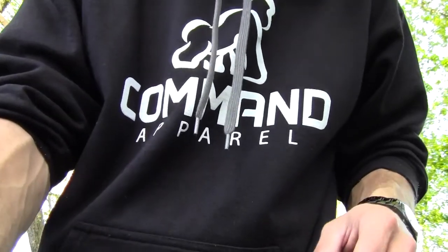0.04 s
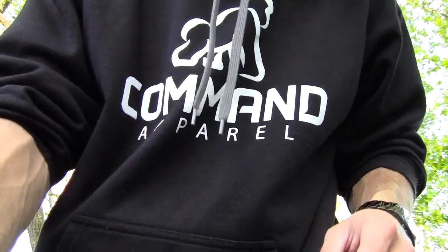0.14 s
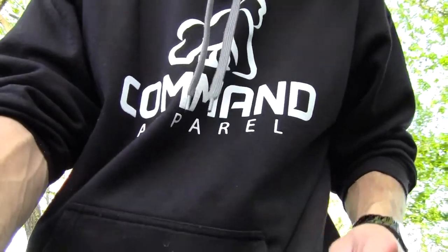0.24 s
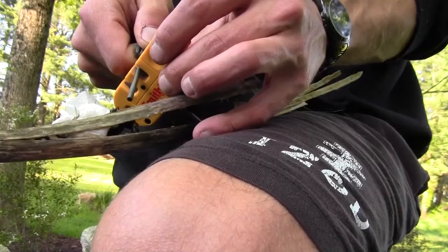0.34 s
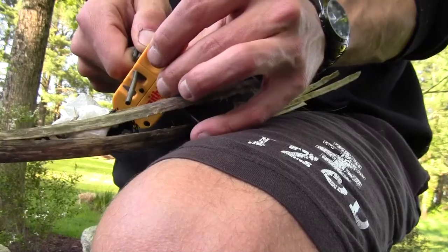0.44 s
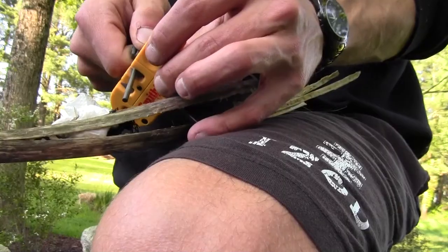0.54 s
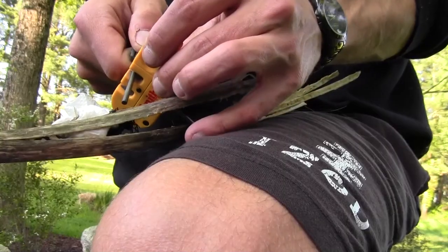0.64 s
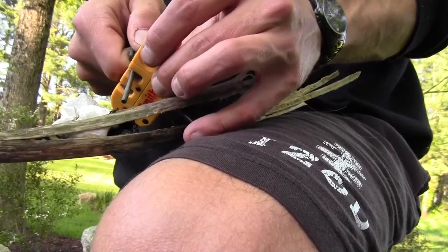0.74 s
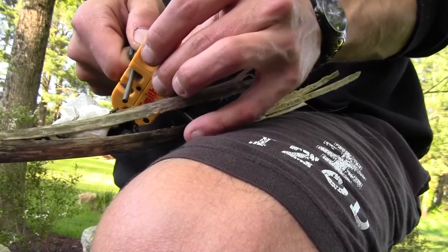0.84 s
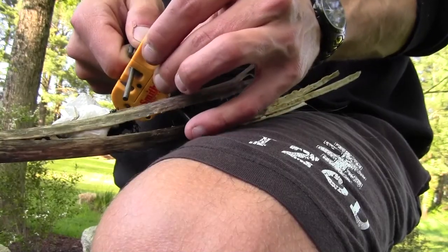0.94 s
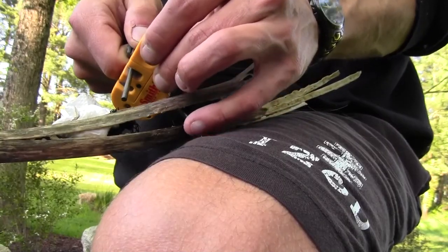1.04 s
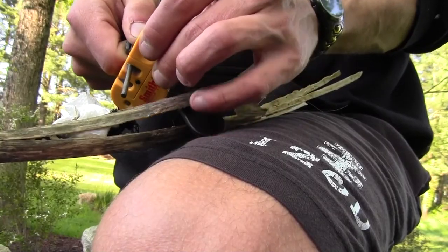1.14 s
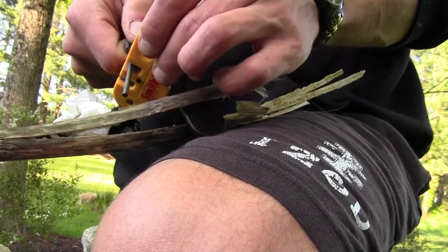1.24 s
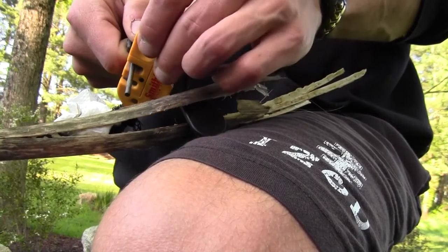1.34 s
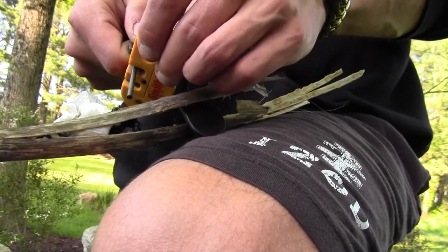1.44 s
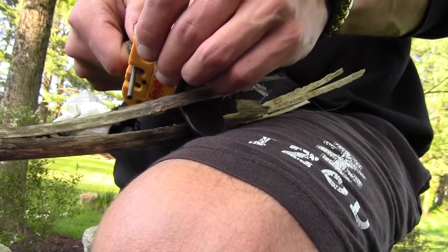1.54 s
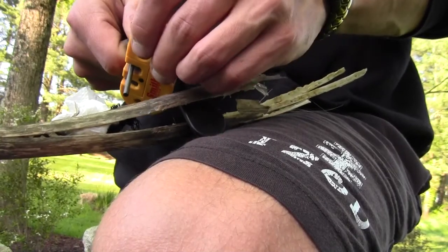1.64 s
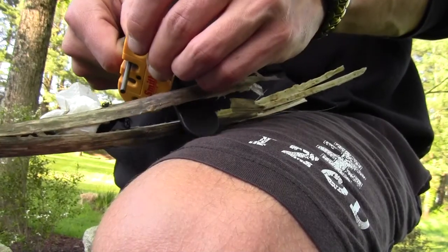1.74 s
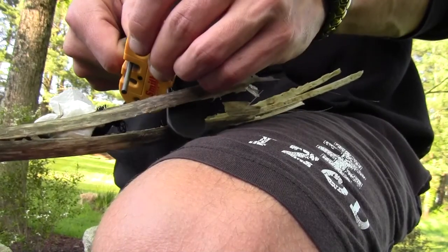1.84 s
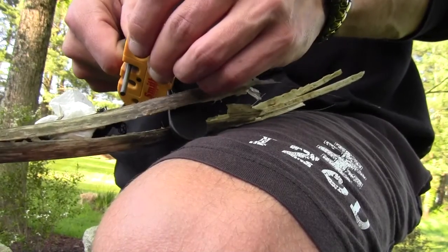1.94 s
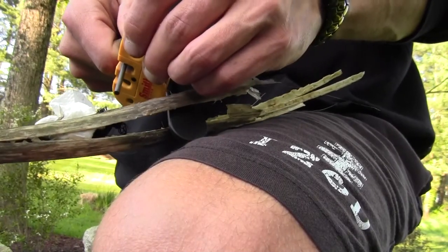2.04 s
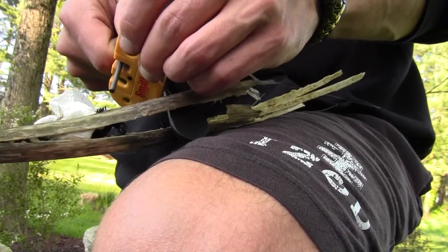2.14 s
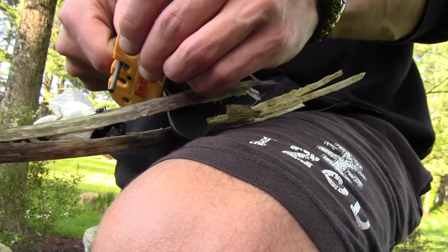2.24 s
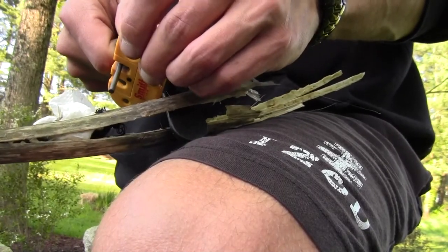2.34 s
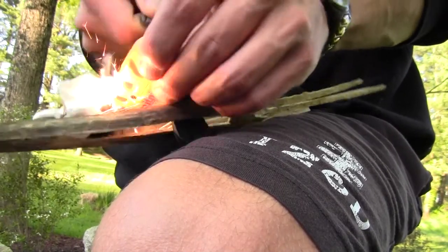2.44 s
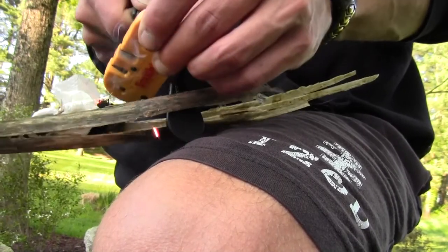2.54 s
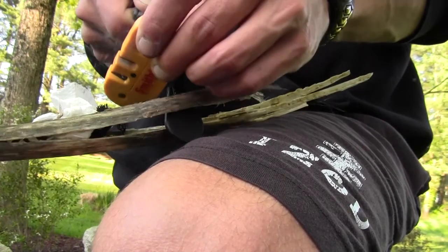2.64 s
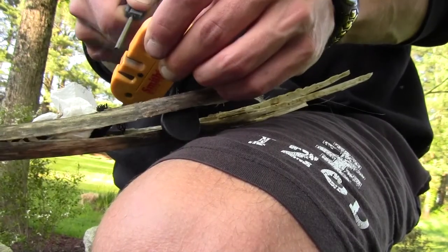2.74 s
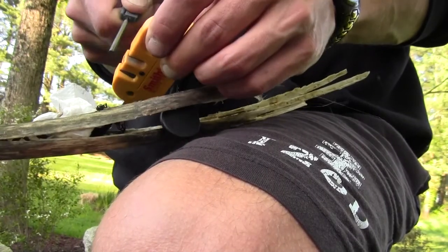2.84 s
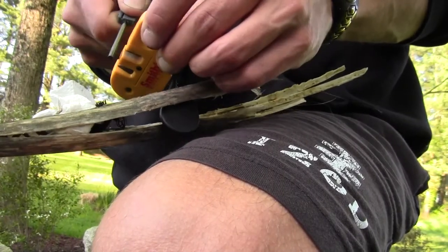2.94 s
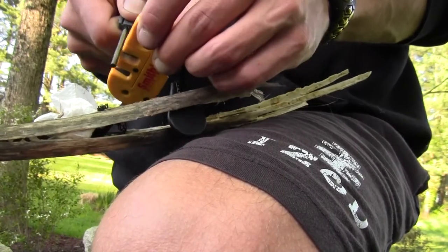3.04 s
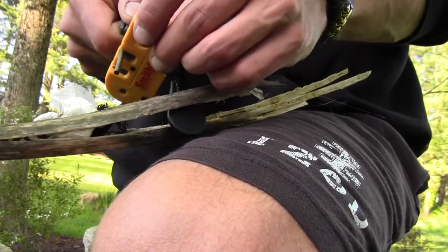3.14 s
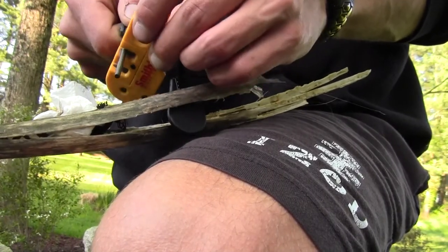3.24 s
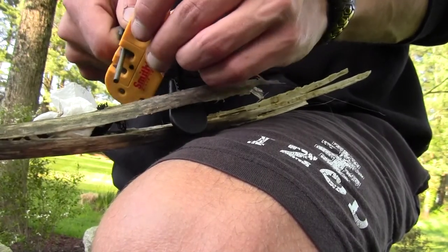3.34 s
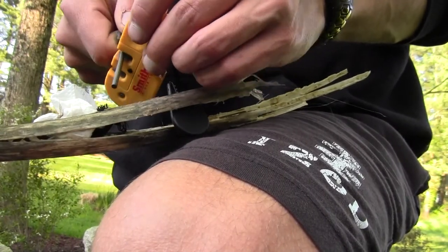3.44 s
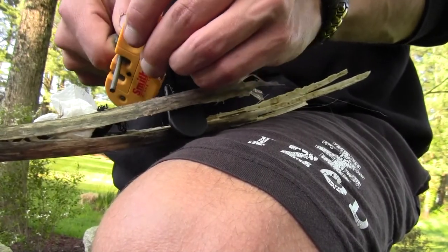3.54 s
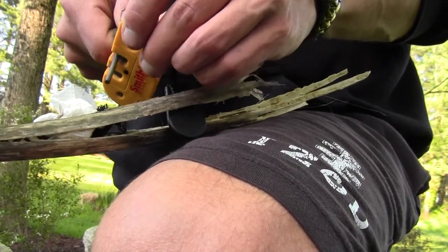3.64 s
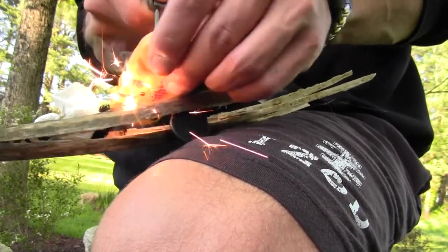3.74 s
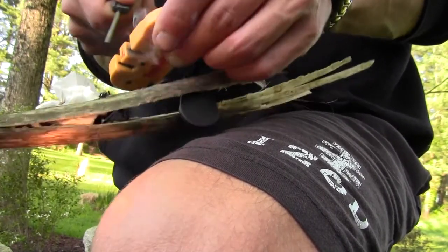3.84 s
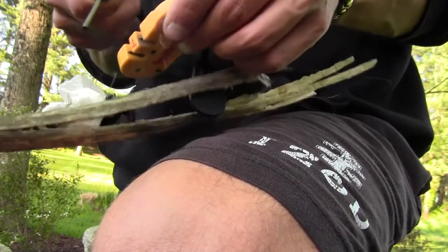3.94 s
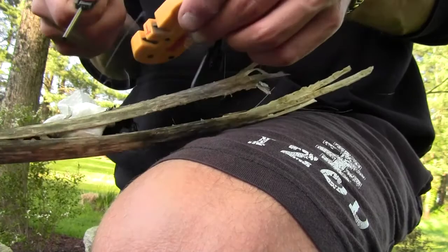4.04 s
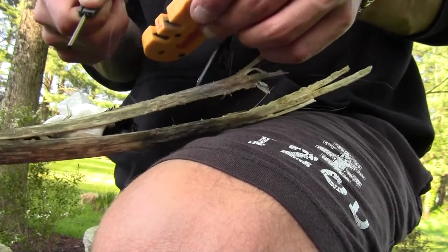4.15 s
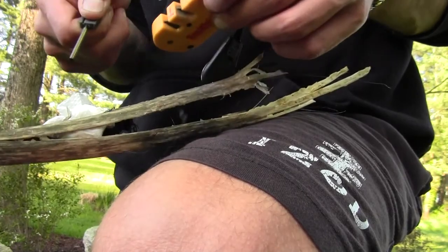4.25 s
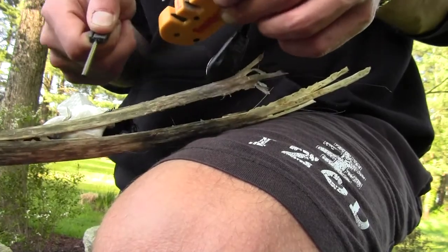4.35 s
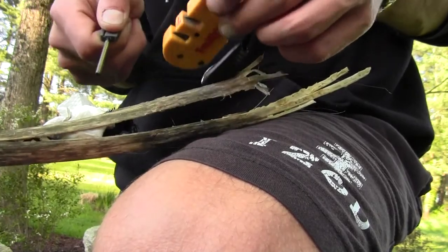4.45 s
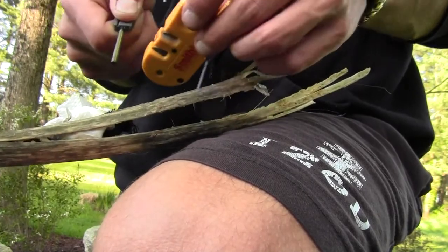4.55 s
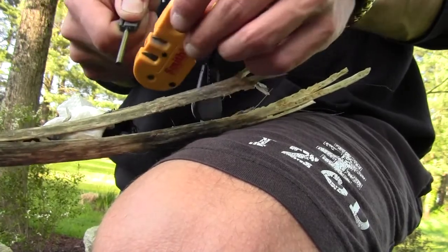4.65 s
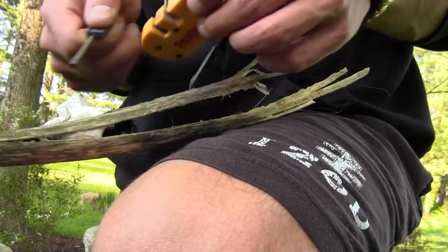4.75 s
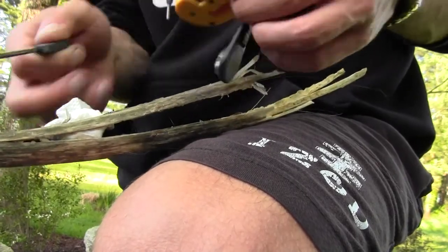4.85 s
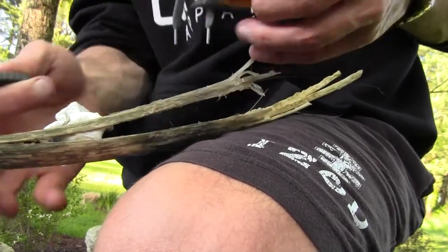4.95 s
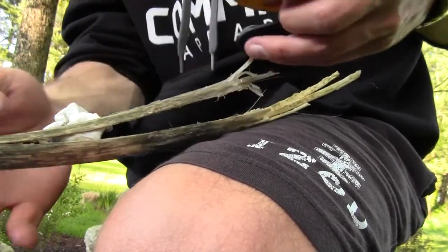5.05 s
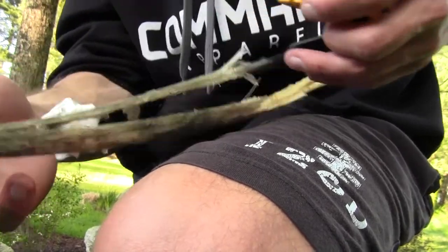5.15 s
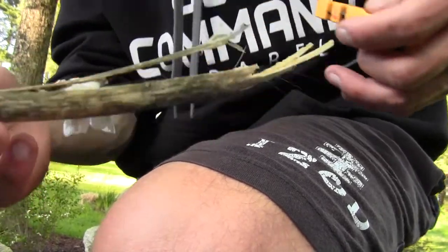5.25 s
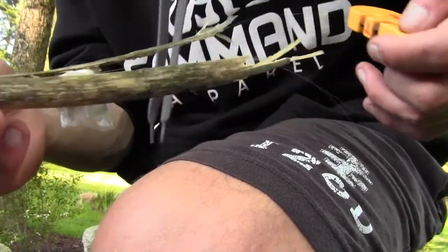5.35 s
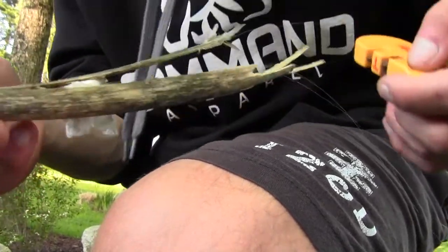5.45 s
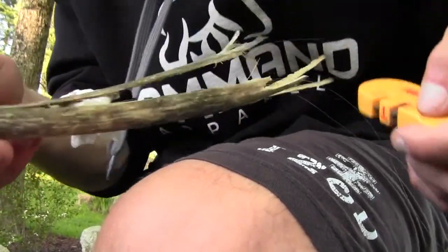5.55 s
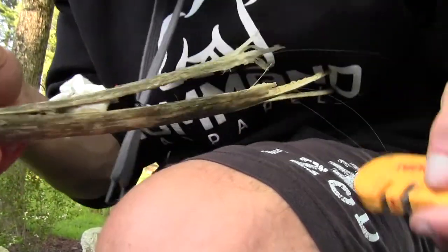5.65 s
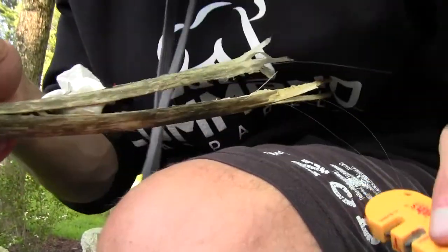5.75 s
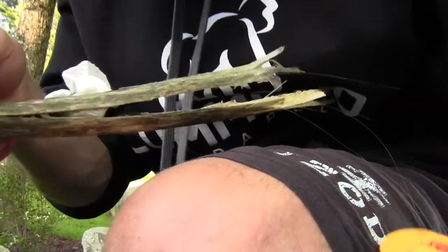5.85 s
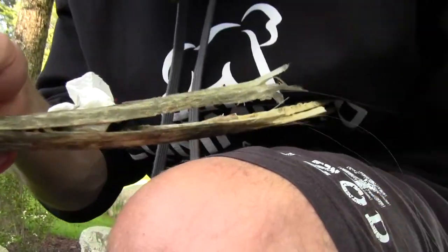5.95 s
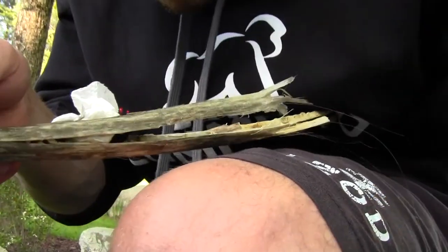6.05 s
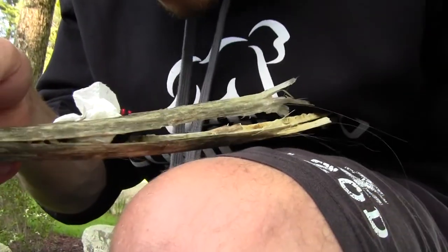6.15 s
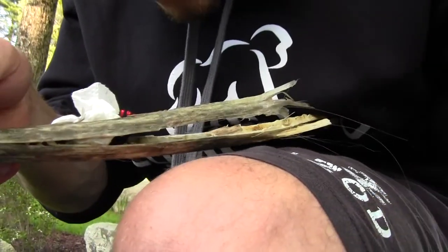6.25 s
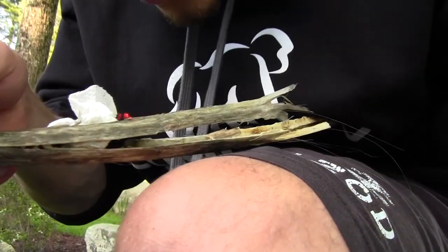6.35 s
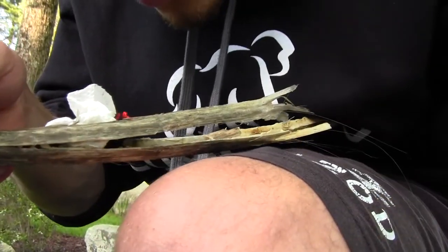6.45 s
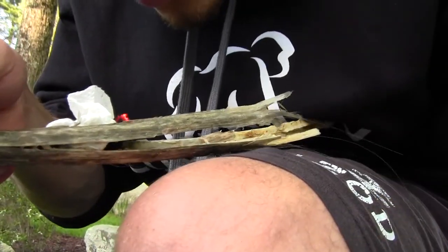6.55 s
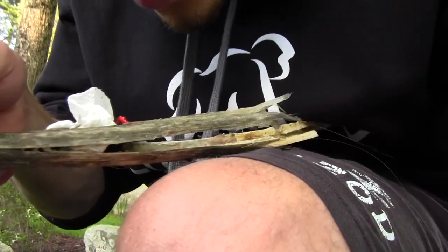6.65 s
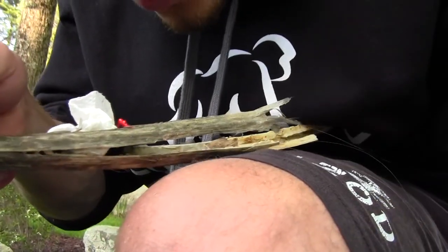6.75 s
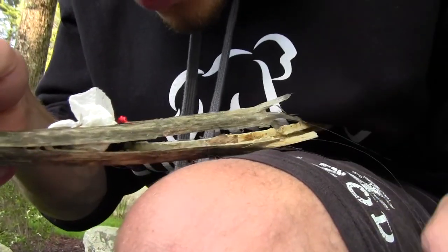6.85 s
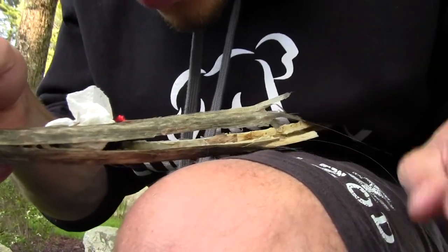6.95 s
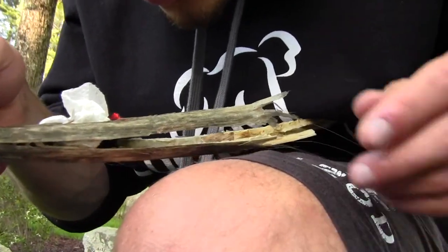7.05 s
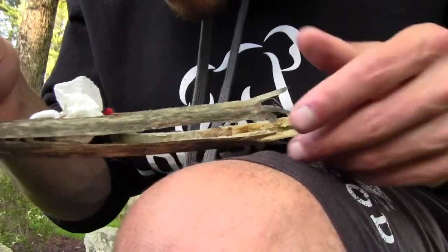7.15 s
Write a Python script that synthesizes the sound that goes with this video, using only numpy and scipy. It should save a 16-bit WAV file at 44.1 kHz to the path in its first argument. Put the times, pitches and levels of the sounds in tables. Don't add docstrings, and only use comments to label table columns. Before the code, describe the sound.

A quiet wood: low, bassy distant traffic that slowly recedes, and a soft hiss of air in leaves. A nearer engine hums until about 0.4 s and stops abruptly, while a close bird gives bright falling and held whistles in the first 0.7 s; fainter chirps follow, with a cluster around 3.1-3.6. Faint finger rustles and tiny clicks lead to a loud, dry, gritty metallic scrape at 2.4-2.6, catching and skipping. Light ticks follow, then a second similar rasp at 3.7-3.85, trailing into busy clicks and rustles until 4.2. Sparse metal clicks continue. At 5.04 a hard bright knock hits and the background suddenly drops, recovering slowly. Softer fumbling and clicks follow, then a broad knock at 6.2, a dull one at 6.3, a bright one at 6.6, a low soft thud at 6.7, and a broad woody knock at 6.94 with rapid dull taps and rubbing to the end, about 7.2.

```python
import sys
import numpy as np
from scipy import signal
from scipy.io import wavfile
from scipy.ndimage import uniform_filter1d

SR = 44100
rng = np.random.default_rng(int(sys.argv[2]) if len(sys.argv) > 2 else 0)


def inscribe(sig):
    pcm = np.round(np.clip(np.atleast_2d(sig).T, -1, 1) * 32767)
    wavfile.write(sys.argv[1], SR, pcm.astype(np.int16))


def gain_from_db(level_db):
    decades = np.asarray(level_db, float) / 20
    return 10 ** decades


N = 317652

# (frequency [Hz], level [dB per Hz])
TRAFFIC_SPECTRUM = [(12, -62.5), (20, -54), (81, 2), (118, -12), (335, -18), (535, -23.5), (780, -65),
                    (1320, -120)]
# (frequency [Hz], level [dB per Hz])
AIR_SPECTRUM = [(150, 6), (250, 0), (735, -3), (1760, -10.5), (2960, -14), (5440, -21), (9490, -28),
                (16000, -35.5)]
# (frequency [Hz], likeness [-1 to 1])
LIKENESS = [(60, 1), (180, 0.91), (550, 0.038), (1650, 0.35), (4970, 0.18), (15000, 0.19)]
# (time [s], level [dB])
HUM_LEVEL = [(0, -41), (.37, -39.5), (.386, -77.5)]
# (time [s], pitch [Hz], level [dB])
SONG = [
    [(.1, 4100, -34), (.125, 3950, -54), (.135, 3470, -47), (.147, 3430, -38.5), (.151, 2520, -38.5),
     (.159, 1590, -50), (.174, 1500, -46)],
    [(6.275, 4650, -60), (6.295, 5200, -51), (6.312, 5050, -56), (6.34, 3900, -63)],
    [(.228, 2636, -33), (.25, 2300, -38), (.27, 2138, -37), (.296, 2040, -38)],
    [(.41, 4750, -33), (.437, 4670, -26), (.444, 4380, -30), (.449, 3680, -36), (.458, 4120, -34),
     (.464, 3900, -39), (.474, 4054, -31.5), (.55, 4160, -37), (.7, 4164, -60)],
    [(3.492, 4900, -34), (3.503, 3950, -39), (3.515, 3590, -43), (3.55, 3505, -41.5), (3.566, 3230, -41),
     (3.575, 2400, -39), (3.585, 2250, -44)],
]
# (time [s], length [s], first pitch [Hz], last pitch [Hz], level [dB])
CHIRPS = [(0.214, 0.038, 5030, 3720, -57), (0.673, 0.089, 6240, 8430, -56.5),
          (1.46, 0.026, 1950, 1880, -48), (1.521, 0.025, 2308, 2420, -40.5), (1.79, .12, 4810, 4720, -45.5),
          (1.91, 0.16, 4750, 4680, -54), (1.9, 0.047, 2920, 2830, -52), (2.005, 0.045, 2000, 2060, -56.5),
          (2.158, 0.17, 2620, 2960, -53), (2.373, 0.046, 2160, 2180, -57.5),
          (3.116, 0.056, 1695, 1970, -52), (3.103, 0.021, 2750, 1800, -54.5),
          (3.113, 0.095, 3240, 4600, -51.5), (3.175, 0.033, 2336, 2430, -45.5),
          (3.176, .02, 2750, 2940, -48), (3.272, 0.019, 2440, 2330, -41), (3.274, 0.037, 2720, 2740, -47.5),
          (3.065, .03, 3200, 3290, -53), (3.575, .07, 3500, 3560, -45.5), (3.289, 0.045, 1646, 1980, -51),
          (3.295, 0.067, 3380, 3900, -47.5), (3.345, 0.015, 2340, 2400, -41.5),
          (3.354, 0.032, 2670, 2910, -43.5), (5.07, 0.052, 2450, 2290, -56), (6.28, .035, 2330, 2650, -61),
          (6.781, 0.014, 2530, 2380, -61.5), (6.845, 0.022, 2090, 2060, -82)]

# (frequency [Hz], width [Hz], level [dB])
STICK = [(560, 350, 1.5), (915, 670, 10.5), (1295, 830, 3), (300, 730, -2.5), (1750, 120, 1)]
TOOL = [(2380, 550, 14.1), (3180, 660, 16.54), (3950, 190, 11), (4640, 910, 11.6), (5100, 1400, 9.7)]
GRIT = [(7390, 6600, 0)]
# (frequency [Hz], width [Hz], level [dB])
ROD = [(1880, 600, -12), (2700, 1050, -0.5), (3135, 780, 5), (3900, 300, 0.5), (4750, 540, 0.5),
       (5350, 900, -8.5)]

# (time [s], length [s], place of the peak [0-1], level [dB])
ON_TOOL = [(.38, 0.06, 0, -33), (1.66, 0.19, 0.8, -45.5), (1.75, 0.12, 0.98, -42), (2.411, 0.029, 0.6, -33),
           (2.85, 0.091, 0.97, -57), (3.17, 0.14, 0.3, -49), (3.28, 0.093, 0.35, -58),
           (3.36, 0.095, 0.78, -45), (3.9, 0.1, 0.35, -36.5), (3.97, 0.056, 0.56, -39),
           (4.11, 0.037, 0.8, -42), (5.05, 0.061, 0.12, -46), (5.89, 0.063, 0.8, -48.5),
           (7.04, 0.15, 0.1, -66), (6.69, 0.11, 0.36, -54)]
IN_HAND = [(1.2, 0.084, 0.37, -52), (1.33, 0.052, 0.14, -47.5), (1.85, 0.09, 0.81, -47.5),
           (2.65, 0.08, 0.49, -45), (3.05, 0.07, 0.52, -50.5), (3.85, 0.067, 0.44, -46),
           (4.02, 0.073, 0.72, -32), (4.155, 0.07, 0.41, -33.5), (4.21, 0.1, .01, -46.5),
           (4.63, 0.082, 0.64, -45), (4.822, 0.037, 0.51, -41.5), (5.195, 0.036, 0.48, -51),
           (5.24, 0.12, 0.33, -45.5), (5.5, 0.078, 0.096, -43.5), (5.595, 0.064, 0.49, -44.5),
           (5.655, 0.053, 0.51, -49.5), (5.71, 0.096, 0.92, -43), (5.79, 0.14, 0.28, -54),
           (5.935, 0.09, 0.27, -39.5), (6.13, 0.023, 0.15, -48.5), (6.535, 0.12, 0.27, -39.5),
           (6.607, 0.019, 0.2, -24.5), (6.627, 0.017, 0.33, -29.5),]
ON_BARK = [(4.47, 0.085, 0.7, -49), (4.55, 0.069, .01, -51.5), (4.72, 0.058, 0.015, -48.5),
           (6.24, 0.15, 0.074, -59.5), (6.39, 0.12, 0.3, -56), (6.645, 0.097, 0.13, -54.5),
           (7.0, 0.1, 0.0088, -49)]
# (time [s], peak [dB], ring [Hz])
METAL_SNAPS = [(.588, -51, 7700), (1.922, -32, 4540), (2.5674, -28, 3620), (3.245, -31, 2870),
               (3.9035, -33.5, 3180), (3.92, -27, 3480), (3.9789, -25.5, 3400), (4.0474, -28, 5140),
               (4.1719, -27.5, 1570), (4.7371, -26.5, 5740), (4.8357, -31.5, 3100), (5.0444, -22.5, 3570),
               (5.2435, -33.5, 4640), (5.448, -45.5, 5340), (5.5119, -32.5, 3900), (5.7404, -31.5, 2380),
               (5.7498, -31, 2380), (5.7843, -41, 2350), (6.0117, -40.5, 2770), (6.1355, -39, 2380),
               (4.446, -52, 7160), (4.878, -43.5, 3660), (1.738, -49, 8000), (1.902, -41, 5900)]
METAL_TICKS = [(2.4945, -11.5, 2880), (3.1994, -36.5, 2860), (3.4121, -32, 2870), (3.6995, -16, 4060),
               (3.709, -20, 4340), (3.9944, -26.5, 7100), (4.5925, -33, 1590), (4.6808, -23, 3720),
               (5.6052, -35, 3500), (5.6156, -31.5, 3550), (5.6351, -32, 3700), (6.6685, -32.5, 2680),
               (6.792, -45.5, 2510), (7.0379, -29, 2780), (7.0025, -25.5, 4500)]
BARK_SNAPS = [(1.1149, -41.5, 4000), (1.3523, -33.5, 2500), (2.5314, -22, 1970), (2.6164, -35, 2560),
              (3.7244, -25, 3060), (3.8137, -22.5, 2930), (4.0562, -26, 3470), (4.1954, -25.5, 1510),
              (4.3241, -44, 2670), (4.3354, -39.5, 1640), (4.4124, -41.5, 5500), (5.5363, -49, 2870),
              (6.2434, -32.5, 5370)]
BARK_TICKS = [(1.8652, -32, 2680), (2.591, -18.5, 3220), (3.6451, -30.5, 3860), (4.0327, -22.5, 1700),
              (4.1589, -33.5, 3240), (5.4076, -31, 3520), (6.4098, -36, 4320), (7.1964, -36.5, 4300)]
# (time [s], peak [dB], ring [Hz])
CATCHES = [(2.4128, -37.5, 3060), (2.4295, -29, 3330), (2.4485, -12, 3260), (2.4715, -11, 3150),
           (2.4805, -14, 3350), (2.4555, -18.5, 4860), (2.5025, -17, 3900), (2.5415, -29, 3300),
           (2.559, -24, 900), (2.587, -25, 2900), (3.6898, -29, 3400), (3.7265, -15.5, 3300),
           (3.738, -15.5, 4300), (3.7675, -12, 3700), (3.7795, -12, 3860), (3.7845, -16, 3870),
           (3.8086, -25, 3180), (3.8155, -24, 3030), (3.828, -22.5, 2930), (3.8365, -34, 2970)]
# (time [s], peak [dB], ring [Hz], tool over peak [dB])
TAPS = [(3.662, -28.5, 300, -26), (5.945, -36, 950, 0), (6.396, -33.5, 544, -2), (6.6087, -23, 785, -8),
        (6.971, -20.5, 1020, -9.5), (6.991, -23, 1000, -34), (7.005, -29, 800, -12),
        (7.0095, -30, 990, -14), (7.015, -34, 1000, -26), (7.044, -35, 1000, -20), (6.328, -38, 706, -20),
        (6.229, -19, 600, -14), (6.942, -34, 900, -23), (6.953, -31, 600, -27), (6.629, -25, 600, -8),
        (7.055, -33, 1000, -18), (7.085, -33, 891, -23), (7.094, -32, 950, -11), (7.104, -37, 990, -11),
        (7.111, -42, 947, -19), (7.156, -34, 880, -28), (7.162, -34, 930, -30), (7.172, -38, 960, -11)]
# (time [s], pressure [dB], how hard the tool bears on the stick [dB])
STROKES = [
    [(2.437, -16, -32), (2.443, -15, -39), (2.464, -19, -37.5), (2.492, -23, -27), (2.499, -20.5, -7.5),
     (2.532, -27.5, -0.5), (2.546, -35.5, -2.5), (2.598, -41.5, 1.5), (2.65, -51, -3)],
    [(3.66, -57, 1), (3.704, -28, -4.5), (3.722, -22, -13.5), (3.728, -21.5, -24), (3.762, -22, -16),
     (3.771, -16.5, -12), (3.784, -25, -10.5), (3.82, -30, 2), (3.86, -48.5, 4.5)],
]
# (time [s], length [s], ring [Hz], width [Hz], level [dB])
RUBS = [(4.1, 0.15, 11500, 3500, -61.5), (4.48, 0.097, 4200, 460, -58), (4.49, 0.095, 1600, 470, -49.5),
        (4.9, .12, 9200, 3300, -63), (4.25, 0.084, 9900, 3000, -65), (4.82, 0.041, 10000, 2500, -55),
        (3.9, 0.069, 7100, 1400, -40), (3.975, .03, 7400, 1500, -48), (4.5, 0.057, 10000, 1500, -48),
        (5.32, 0.18, 3570, 500, -64), (5.5, 0.066, 960, 150, -46), (6.5, .09, 940, 170, -55.5),
        (6.9, 0.11, 3000, 2800, -62), (6.38, 0.044, 550, 310, -43.5), (6.41, .08, 610, 360, -47),
        (7.7, .08, 410, 410, -48), (6.69, 0.073, 10000, 2500, -59.5), (6.7, 0.08, 6600, 1800, -59),
        (6.68, 0.068, 2800, 1100, -57), (7.05, 0.19, 5700, 700, -58.5), (7.07, 0.18, 3530, 1500, -53),
        (7.06, 0.22, 8900, 1570, -66.5), (6.4, .1, 8000, 4800, -61), (6.33, .1, 3700, 3100, -59)]
KNOCKS = [
    (5.0387, 0.0036, -24, .05, [(1986, 320, -25.5), (2700, 770, -8), (3900, 1000, -7), (6790, 1100, -9), (9180, 1840, -0.5), (10830, 1550, -8)]),
    (6.2228, 0.0076, -28, 0.37, [(295, 250, -18.5), (518, 46, -28.5), (620, 200, -20), (786, 710, -4), (2700, 170, -27), (4440, 1300, -9.5), (7760, 2700, -11)]),
    (6.3212, 0.014, -29.5, 0.53, [(620, 68, -38.5), (980, 740, -19), (1750, 790, -30)]),
    (6.6208, 0.003, -19.5, .05, [(635, 1300, -12), (2510, 1400, -15), (4840, 700, -3.5), (6030, 1000, -7.5), (9850, 2000, -9.5)]),
    (6.731, 0.029, -19.5, .05, [(335, 310, -33), (480, 71, -47)]),
    (6.9365, 0.004, -29, 0.73, [(385, 230, -23), (640, 57, -33.5), (924, 400, -11.5), (1220, 710, -6.5), (1750, 400, -12), (2700, 1500, -9.5), (3950, 4500, -12)]),
]

TRAFFIC_DB, TRAFFIC_DB_PER_S = -43, -0.73
AIR_DB, AIR_DB_PER_S = -46.5, .5
DUCK_S, DUCK_DB, DUCK_BASS_DB, RECOVER_DB_PER_S = 5.02, -9, -0.5, 1.5
ROUGH_HZ_PER_S = 50000
TOOL_DB, HAND_DB, BARK_DB = (-10.5, -9), (-3.5, -7.5), (7.5, -4.5)  # (stick, grit) over the tool [dB]
CLICK_T60, TAP_T60, TAP_DELAY_S = .011, .016, .002
SPEED_UP_S, GRIT_SLOW_DB, GRIT_FAST_DB = 0.059, -18, -5


def evened(x):
    return x / np.sqrt(np.mean(x ** 2) + 1e-20)


def add(mix, s, sound):
    part = mix[..., round(s * SR):][..., :sound.shape[-1]]
    part += sound[..., :part.shape[-1]]


def noise(spectrum, patchy_db):
    frames = N // 256 + 5
    hz = np.fft.rfftfreq(1024, 1 / SR)

    def read(table):
        table_hz, values = np.transpose(table)
        return np.interp(np.log(hz + 1), np.log(table_hz + 1), values)[:, None]

    a, b, c, d, patches = rng.standard_normal((frames, 513, 5)).T
    patches = uniform_filter1d(uniform_filter1d(patches, size=12, axis=0), size=14, axis=1)
    colour = gain_from_db(read(spectrum) + patchy_db * evened(patches))
    same = np.clip(read(LIKENESS), -1, 1)
    left = a + 1j * b
    right = same * left + np.sqrt(1 - same ** 2) * (c + 1j * d)
    z = np.array([left, right]) * colour
    return evened(signal.istft(z, nperseg=1024, noverlap=768)[1][:, :N])


def wood():
    t = np.arange(N) / SR
    ducked = t > DUCK_S
    gain_db = ducked * (DUCK_DB + RECOVER_DB_PER_S * (t - DUCK_S))
    hum = noise([(60, -39), (130, 5), (200, 5.5), (280, -0.5), (500, -7.5), (1500, -15.0),
                    (4000, -38.5)], patchy_db=3.0)
    hum_db = np.interp(t, *np.transpose(HUM_LEVEL), right=-200)
    traffic_db = TRAFFIC_DB + TRAFFIC_DB_PER_S * t + gain_db + ducked * DUCK_BASS_DB
    air_db = AIR_DB + AIR_DB_PER_S * t + gain_db
    traffic = gain_from_db(traffic_db) * noise(TRAFFIC_SPECTRUM, patchy_db=-1.0)
    air = gain_from_db(air_db) * noise(AIR_SPECTRUM, patchy_db=1.5)
    return traffic + air + gain_from_db(hum_db) * hum


def echoes(x, t60, start):
    slots = np.arange(start, SR - 20, 20)
    at = slots + rng.integers(0, 20, (2, len(slots)))
    taps = np.zeros((2, SR))
    np.put_along_axis(taps, at, rng.choice([-1., 1.], at.shape), 1)
    taps *= gain_from_db(-60 * np.arange(SR) / SR / t60)
    return signal.fftconvolve(x[None], taps / np.linalg.norm(taps[0]), axes=1)[:, :N]


def birds():
    song = np.zeros(N)
    waver = evened(uniform_filter1d(rng.standard_normal((2, N)), size=150))
    glides = [[(s, first, db), (s + length, last, db)] for s, length, first, last, db in CHIRPS]
    for rows in SONG + glides:
        s, hz, db = np.transpose(rows)
        t = np.arange(s[0], s[-1], 1 / SR)
        glide_speed = abs(hz[-1] - hz[0]) / (s[-1] - s[0])
        hoarse = np.clip(glide_speed / ROUGH_HZ_PER_S, .17, .55)
        pitch, strength = hoarse * waver[:, round(s[0] * SR):][:, :len(t)]
        phase = 2 * np.pi * np.cumsum(np.interp(t, s, hz) * (1 + .012 * pitch)) / SR
        whistle = np.sqrt(2) * (np.sin(phase) + gain_from_db(-46.0) * np.sin(2 * phase))
        loudness = gain_from_db(np.interp(t, s, db)) * gain_from_db(11.5 * strength)
        add(song, s[0], loudness * whistle * signal.windows.tukey(len(t), .4))
    far = echoes(song, t60=.9, start=300)
    near = echoes(song, t60=.1, start=60)
    return gain_from_db(-4) * song + gain_from_db(-14) * (far + .8 * far[::-1]) + gain_from_db(-5) * near


def ring(modes):
    t = np.arange(1500) / SR
    out = np.zeros(len(t))
    for hz, width, db in modes:
        decay = np.pi * width * t
        out += gain_from_db(db) * np.e * decay * np.exp(-decay) * np.sin(2 * np.pi * hz * t)
    return out


def bodies(drive, metal):
    out = np.zeros(N)
    for force, modes in zip(drive, (metal, STICK, GRIT)):
        answer = ring([(hz, width, db + 10 * np.log10(width)) for hz, width, db in modes])
        out += signal.oaconvolve(force, answer / np.linalg.norm(answer))[:N]
    return out


def friction(tables, metal, slips_per_s, spread_db, smooth, edge_s, patchy_db):
    sizes = gain_from_db(spread_db * np.minimum(rng.exponential(1, (3, N)), 4))
    slips = sizes * (rng.random((3, N)) < slips_per_s / SR)
    slips = evened(signal.lfilter([1], [1, -.93], slips + .5 * slips[::-1]))
    touch = evened((smooth + slips) * rng.standard_normal((3, N)))
    press = np.zeros((3, N))
    for rows in tables:
        s, tool_db, stick_db, grit_db = np.transpose(rows)
        t = np.arange(s[0], s[-1], 1 / SR)
        body_db = (tool_db, tool_db + stick_db, tool_db + grit_db)
        levels = np.array([np.interp(t, s, db) for db in body_db])
        add(press, s[0], gain_from_db(levels) * signal.windows.tukey(len(t), min(edge_s * SR / len(t), 1)))
    z = signal.stft(bodies(touch * press, metal), nperseg=256)[2]
    grip = uniform_filter1d(rng.standard_normal(z.shape), size=4, axis=0)
    grip = uniform_filter1d(grip, size=12, axis=1)
    return signal.istft(z * gain_from_db(patchy_db * evened(grip)), nperseg=256)[1][:N]


def rustles():
    swells = []
    for rows, shares_db in ((ON_TOOL, TOOL_DB), (IN_HAND, HAND_DB), (ON_BARK, BARK_DB)):
        for s, length, peak, db in rows:
            shape = ((0, -9), (np.clip(peak, 0, 1), 0), (1, -13), (1.35, -24))  # (place, level [dB])
            swells.append([(s + length * u, db + dip_db, *shares_db) for u, dip_db in shape])
    return friction(swells, TOOL, slips_per_s=500, spread_db=4.5, smooth=0.94, edge_s=0.019, patchy_db=2.5)


def clicks():
    drive, own, t = np.zeros((3, N)), np.zeros(N), np.arange(1300) / SR
    # (events, stick over peak [dB], grit over peak [dB])
    kinds = [(METAL_SNAPS, -23, -5.5), (METAL_TICKS, -16.5, -21), (BARK_SNAPS, -0.55, -6),
             (BARK_TICKS, 0, -25), (CATCHES, -12, -12)]
    rows = []
    for kind, stick_db, grit_db in kinds:
        shares_db = [-3, stick_db - 1.0, grit_db + 5.5]
        rows += [(s, db, hz, shares_db, CLICK_T60) for s, db, hz in kind]
    for s, db, hz, tool_db in TAPS:
        rows.append((s + TAP_DELAY_S, db, hz, [tool_db, -1, tool_db - 27.5], TAP_T60))
    cracks = rng.standard_normal((len(rows), 3, len(t)))
    for (s, db, hz, shares_db, t60), crack in zip(rows, cracks):
        fall = gain_from_db(db - 60 * t / t60)
        add(drive, s, crack * fall * gain_from_db(np.array(shares_db))[:, None])
        onset = np.minimum(t * hz / 0.33, 1)
        add(own, s, gain_from_db(3.5) * fall * np.sin(2 * np.pi * hz * t) * onset)
    return bodies(drive, TOOL) + own


def strokes():
    tables = []
    for rows in STROKES:
        start = rows[0][0]
        grit_db = [np.interp(row[0] - start, [0, SPEED_UP_S], [GRIT_SLOW_DB, GRIT_FAST_DB]) for row in rows]
        tables.append([(*row, db) for row, db in zip(rows, grit_db)])
    return friction(tables, ROD, slips_per_s=900, spread_db=3.2, smooth=1.1, edge_s=.003, patchy_db=2.5)


def rubs():
    out = np.zeros(N)
    for (s, length, hz, width, db), grain in zip(RUBS, rng.standard_normal((len(RUBS), 9000))):
        swell = signal.windows.tukey(round(length * SR), .7)
        hiss = evened(signal.oaconvolve(grain, ring([(hz, width, 0)])))
        add(out, s, gain_from_db(db) * swell * hiss[500:][:len(swell)])
    return out


def knocks():
    out = np.zeros(N)
    chatters = rng.standard_normal((len(KNOCKS), 3000))
    for (s, length, chatter_db, dull, modes), chatter in zip(KNOCKS, chatters):
        soft = evened(signal.lfilter([1], [1, -np.clip(dull, 0, .95)], chatter))
        blow = gain_from_db(chatter_db) * soft * np.exp(-np.arange(3000) / SR / length)
        blow[0] = 1
        add(out, s, np.convolve(blow, ring(modes)))
    return out


def scene():
    small = rustles() + clicks()
    small = signal.sosfilt(signal.butter(3, 11000, fs=SR, output="sos"), small)
    sharp = strokes() + rubs() + knocks()
    sharp = signal.sosfilt(signal.butter(6, 13600, fs=SR, output="sos"), sharp)
    hands = signal.sosfilt(signal.butter(2, 180, "high", fs=SR, output="sos"), small + sharp)
    near = gain_from_db(-10) * echoes(signal.lfilter([1, -.8], [1], hands), t60=0.02, start=30)
    return hands * gain_from_db(np.array([[.9], [-.9]])) + near + birds() + wood()


def top_cut(x):
    return signal.sosfilt(signal.butter(12, 16650, fs=SR, output="sos"), x)


def record(dry):
    top = signal.firwin(255, 15650, fs=SR)
    heard = signal.oaconvolve(dry, top[None], "same")
    heard = signal.sosfilt(signal.butter(3, 36, "high", fs=SR, output="sos"), heard)
    return top_cut(np.clip(heard, -1, 1))


dry = scene()
out = record(dry)
inscribe(out)
```